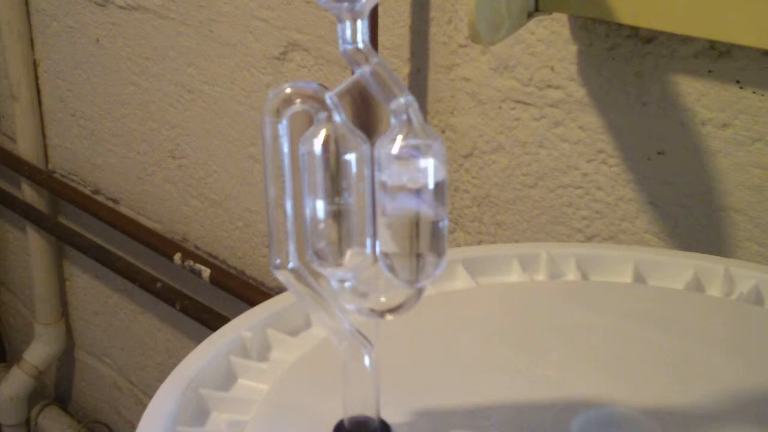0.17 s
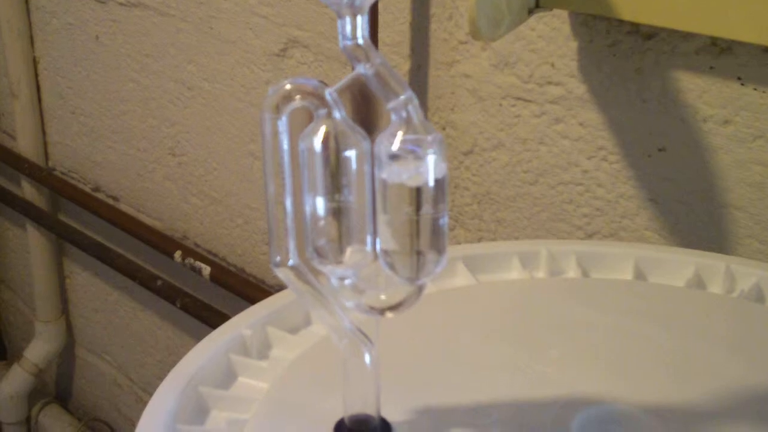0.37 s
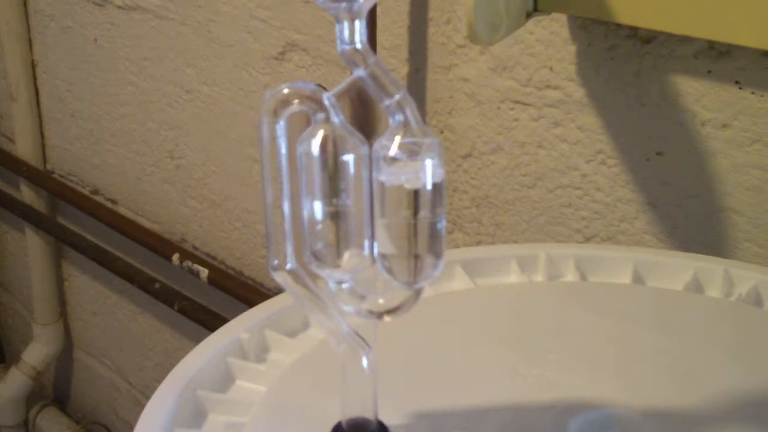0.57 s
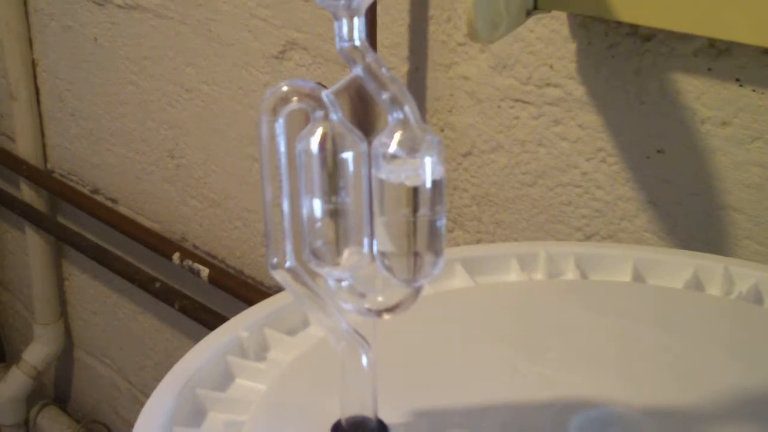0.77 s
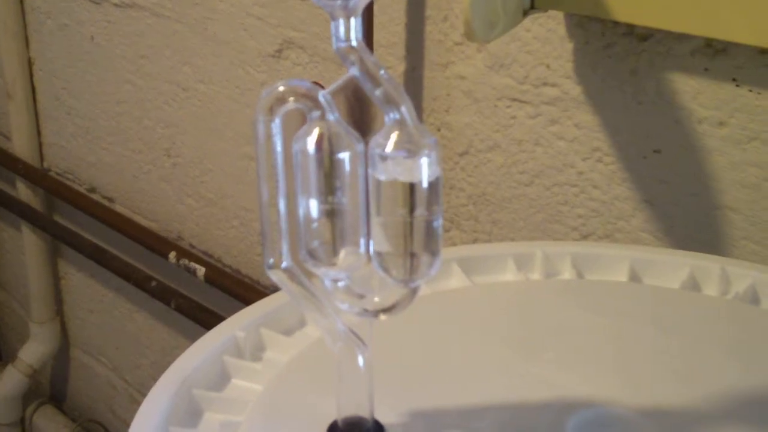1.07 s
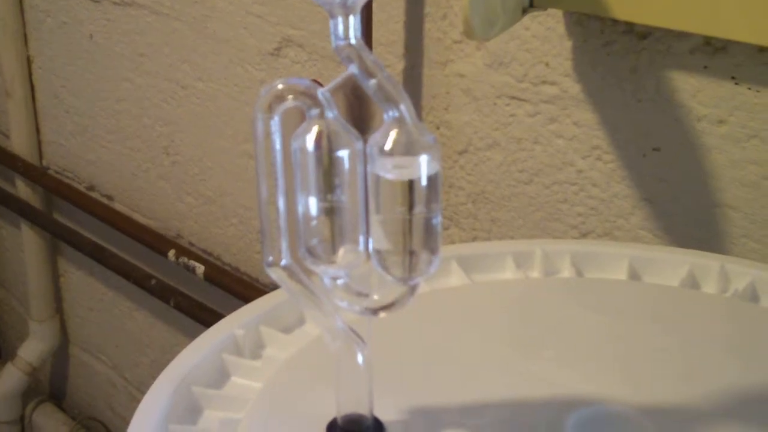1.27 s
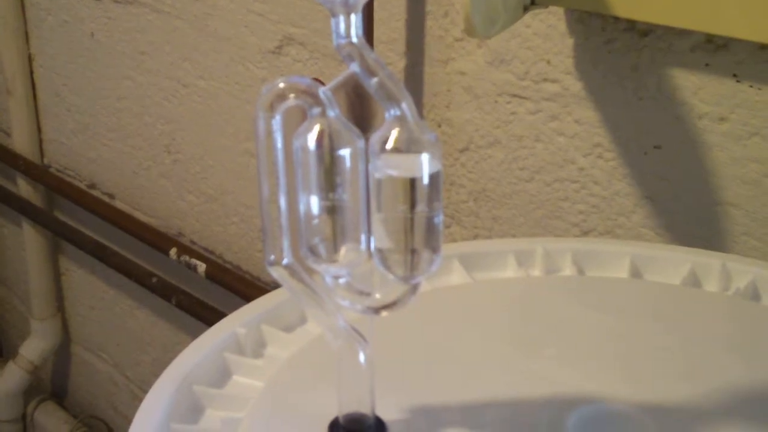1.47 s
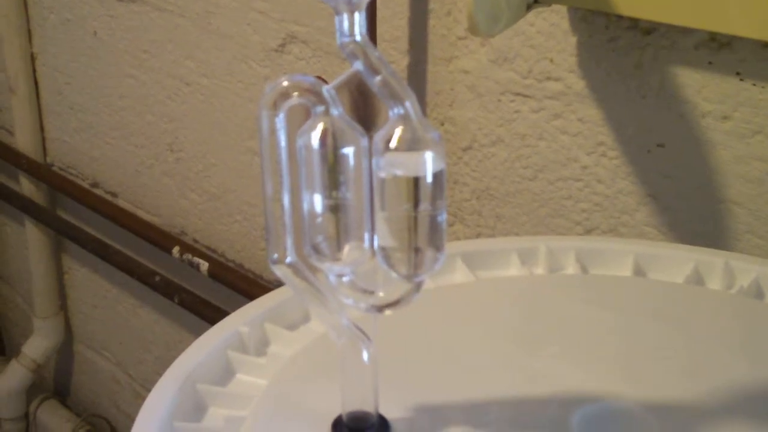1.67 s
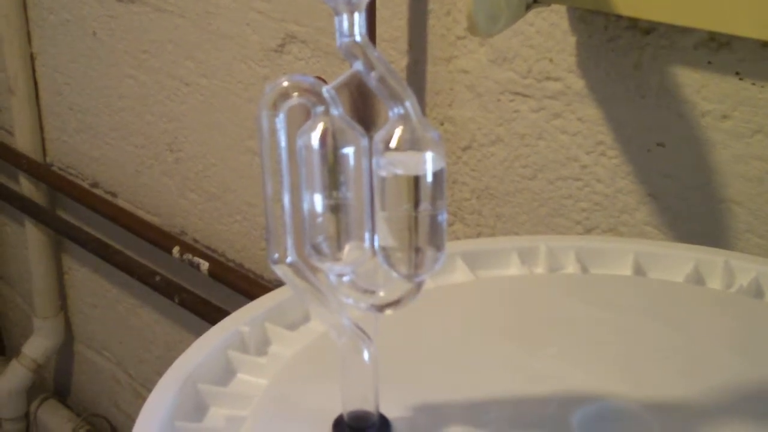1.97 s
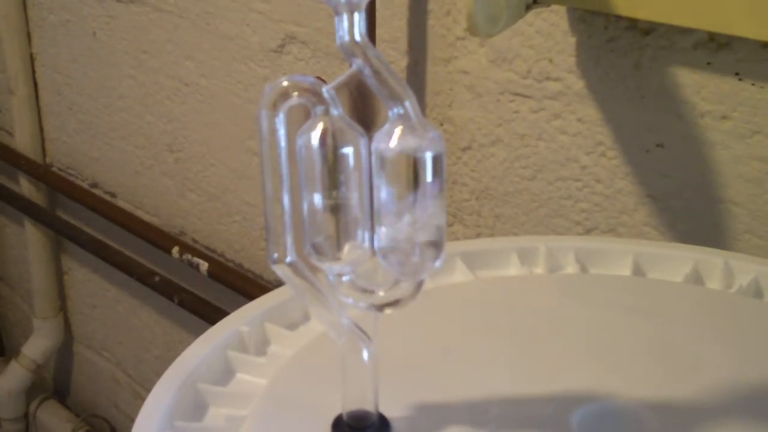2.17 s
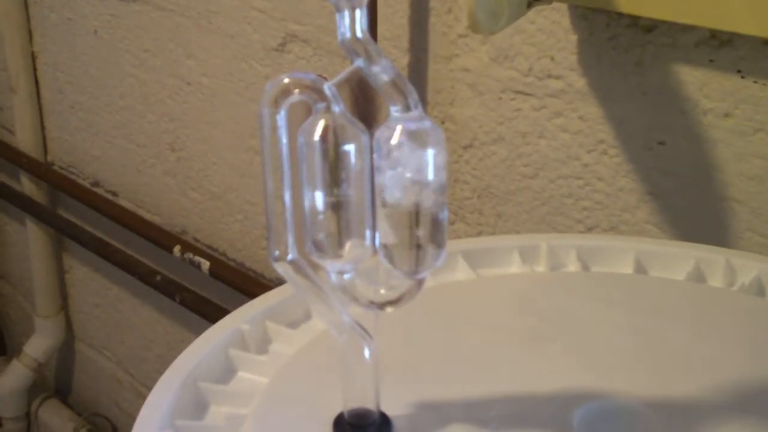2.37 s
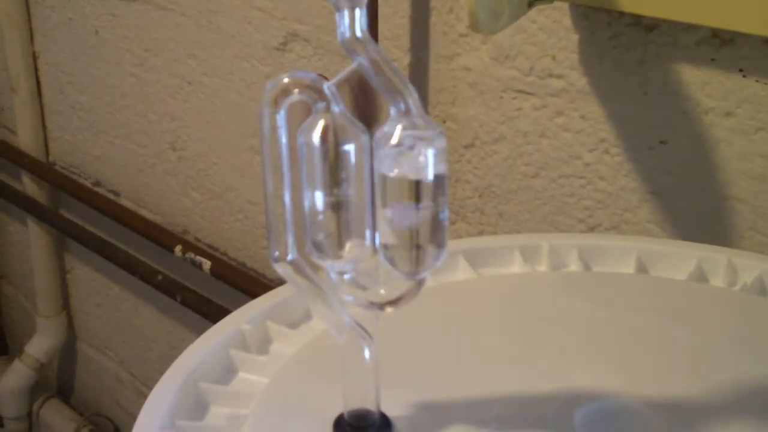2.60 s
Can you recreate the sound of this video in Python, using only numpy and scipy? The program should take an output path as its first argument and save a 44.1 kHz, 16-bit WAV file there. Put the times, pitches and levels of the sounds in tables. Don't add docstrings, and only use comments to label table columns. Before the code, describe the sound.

After a brief silence and a click, steady low machinery rumble and thin lens-motor buzzing fill a cellar; then a rapid string of watery blubs and soft lid thumps bursts from a bucket's airlock near the camera microphone.

```python
import sys
import numpy as np
from scipy import signal
from scipy.fft import rfft, irfft
from scipy.io import wavfile

SR = 44100
rng = np.random.default_rng(int(sys.argv[2]) if len(sys.argv) > 2 else 0)


def makeup_ratio(level_db):
    decades = np.asarray(level_db, float) / 20
    return 10 ** decades


def digitize_waveform(pressure):
    field = np.atleast_2d(pressure).T
    bounded = np.clip(field, -1, 1)
    quanta = np.round(bounded * 32767).astype(np.int16)
    wavfile.write(sys.argv[1], SR, quanta)


N = 120834
TIME_S = np.arange(N) / SR
FRAME_HZ = 29.97


def rms_one(x):
    return x / np.sqrt(np.mean(x ** 2) + 1e-20)


def resonate(x, hz, width_hz):
    r = np.exp(-np.pi * width_hz / SR)
    zeros = np.array([1, 0, -1]) * (1 - r * r) / 2
    poles = [1, -2 * r * np.cos(2 * np.pi * hz / SR), r * r]
    return signal.lfilter(zeros, poles, x)


def resonate_twice(x, hz, width_hz):
    return resonate(resonate(x, hz, width_hz), hz, width_hz)


def gate(t, start, length, edge):
    inside = np.minimum(t - start, start + length - t)
    return np.clip(inside / edge + .5, 0, 1)


def swell(age, rise):
    u = np.maximum(age, 0) / rise
    return u * np.exp(1 - u)


def blip(start, db, hz, rise, climb):
    age = np.maximum(TIME_S - start, 0)
    return makeup_ratio(db) * swell(age, rise) * np.sin(2 * np.pi * hz * age * (1 + climb * age))


# [t/s, peak level/dB, lid f/Hz]
SLUGS = [
    (2.188, -39, 160),
    (2.232, -28, 160),
    (2.263, -33, 165),
    (2.287, -29, 168),
    (2.305, -27, 168),
    (2.335, -30, 165),
    (2.369, -27, 150),
    (2.408, -24.5, 148),
    (2.438, -31, 155),
    (2.487, -32, 142),
]


def lid_thumps():
    push = sum(blip(start, db, hz, .0065, 0) for start, db, hz in SLUGS)
    return push + makeup_ratio(-4) * resonate(push, 164, 14)


def water_slosh():
    level_db, rise_s, lead_s = -22, .0077, .013
    envelope = sum(makeup_ratio(db + level_db) * swell(TIME_S - start + lead_s, rise_s) for start, db, _ in SLUGS)
    band = signal.butter(2, [343, 1270], "band", fs=SR, output="sos")
    return envelope * rms_one(signal.sosfilt(band, rng.standard_normal(N)))


# [t/s, peak level/dB, f/Hz]
BUBBLE_RINGS = [(2.183, -34.5, 396), (2.203, -34.5, 690), (2.212, -39, 584), (2.222, -36, 696),
                (2.232, -38, 600), (2.237, -40.5, 395), (2.254, -37, 552), (2.284, -38.5, 1170),
                (2.291, -42, 385), (2.293, -48, 1240), (2.305, -37.5, 567), (2.356, -53, 690),
                (2.366, -37, 723), (2.38, -39, 570), (2.413, -37, 542), (2.436, -40, 620)]


def bubble_rings():
    rise_cycles, climb_per_s = 2.7, 1
    return sum(blip(start, db, hz, rise_cycles / hz, climb_per_s) for start, db, hz in BUBBLE_RINGS)


def airlock():
    return lid_thumps() + water_slosh() + bubble_rings()


# [f/Hz, width/Hz, level/dB]
SHELL_MODES = [(6240, 540, -7), (7750, 490, -5.5), (8270, 320, 0), (9330, 540, -13), (11170, 780, -6),
               (12760, 170, 0), (13200, 340, -4.5), (13950, 320, -14), (14600, 900, -16)]


def shell_rattle():
    steps_per_s, jitter, spread_db = 133, .07, 1.5
    decay_s, steady_scrape = .001, .75
    draws = rng.standard_normal((500, 2))
    at = (np.arange(500) + jitter * draws[:, 0]) / steps_per_s
    keep = (at > 0) & (at < TIME_S[-1])
    kicks = np.zeros(N)
    kicks[(at[keep] * SR).astype(int)] = makeup_ratio(spread_db * draws[keep, 1])
    frame_ticks = np.arange(82) / FRAME_HZ + .007
    kicks[(frame_ticks * SR).astype(int)] += makeup_ratio(2)
    bursts = signal.lfilter([1], [1, -np.exp(-1 / (decay_s * SR))], kicks) + steady_scrape
    scrape = bursts * rng.standard_normal(N)
    shell = np.zeros(N)
    for k, (hz, width, db) in enumerate(SHELL_MODES):
        sign = (-1) ** k
        shell += sign * makeup_ratio(db) * resonate_twice(scrape, hz, 1.5 * width)
    return rms_one(shell)


# [start t/s, length t/s, level/dB]
MOTOR_RUNS = [
    (0.415, 0.65, -53),
    (1.257, 0.036, -53),
    (1.349, 0.174, -53),
    (1.558, 0.03, -54),
    (1.748, 0.042, -54),
    (1.858, 0.036, -53),
    (1.958, 0.032, -54),
    (2.255, 0.036, -53),
    (2.351, 0.09, -53),
    (2.556, 0.036, -52),
]
# [start t/s, length t/s, level/dB]
MOTOR_MORE_RUNS = [
    (.168, 0.021, -59),
    (.236, 0.022, -58),
    (.368, .024, -56),
    (1.143, 0.035, -54),
]


def lens_motor():
    trim_db, trim_s, edge_s, idle_db = 3.5, .0099, .0033, -55.5
    drive = np.zeros(N)
    for start, length, db in list(MOTOR_RUNS) + list(MOTOR_MORE_RUNS):
        drive += makeup_ratio(db + trim_db) * gate(TIME_S, start, length - trim_s, edge_s)
    return np.maximum(drive, makeup_ratio(idle_db)) * shell_rattle()


def tone(hz, db):
    return np.sqrt(2) * makeup_ratio(db) * np.sin(2 * np.pi * hz * TIME_S)


# [f/Hz, level/dB]
READOUT_TONES = [(7867.1, -66), (7492.5, -70)]
# [f/Hz, level/dB]
CLOCK_TONES = [(6000, -75), (7000, -82), (11000, -78), (12000, -79), (14000, -83), (8231, -75),
               (12742, -76)]


def electronics():
    phase = TIME_S % (1 / FRAME_HZ)
    pause_at, pause_s = .012, .0095
    pause = gate(phase, pause_at - pause_s / 2, pause_s, .002)
    whine = tone(14985, -67.5) * (1 - pause)
    frame = (TIME_S * FRAME_HZ).astype(int)
    third_frame_db, spread_db, bleed = 7, 3, .45
    frame_gain = makeup_ratio(third_frame_db * (frame % 3 == 0) + spread_db * rng.standard_normal(90)[frame])
    chirp_at, chirp_s = .0135, .013
    readout = gate(phase, chirp_at - chirp_s / 2, chirp_s, .0054)
    chirps = sum(tone(hz, db) for hz, db in READOUT_TONES) * (bleed + frame_gain * readout)
    return whine + chirps + sum(tone(hz, db) for hz, db in CLOCK_TONES)


def coloured(points):
    hz = np.arange(1, N // 2 + 2) * SR / N
    p = np.array(points)
    db = np.interp(np.log(hz), np.log(p[:, 0]), p[:, 1], left=-90, right=-90)
    return rms_one(irfft(rfft(rng.standard_normal(N)) * makeup_ratio(db), N))


# [f/Hz, level/dB]
RUMBLE_SPECTRUM = [(5, -16), (10, -5.5), (18, -1), (28, -11.5), (46, -22), (70, -8), (115, -17.5),
                   (190, -15), (225, -30)]
# [f/Hz, level/dB]
FAN_SPECTRUM = [(120, -28), (210, -6.5), (363, -1), (388, -7.5), (438, -1.5), (560, -5), (633, -2),
                (1170, -6), (2000, -16), (2600, -38), (4400, -120)]
# [f/Hz, level/dB]
HISS_SPECTRUM = [(1200, -26), (1900, 1.5), (4050, -2.5), (4900, -6), (5550, -13.5), (7000, -9),
                 (10000, -18), (14400, -30), (15400, -3)]
# [f/Hz, width/Hz, rms level/dB]
MACHINE_HUMS = [(17.5, 5, -41), (67, 10, -49), (103, 8, -53), (158, 14, -51), (260, 20, -58),
                (520, 20, -59.5), (641, 40, -56), (767, 10, -61), (903, 18, -61), (1138, 3, -56.5),
                (1501, 18, -66)]


def cellar():
    white = rng.standard_normal(N)
    hums = sum(makeup_ratio(db) * rms_one(resonate_twice(white, hz, width)) for hz, width, db in MACHINE_HUMS)
    rumble = makeup_ratio(-36.5) * coloured(RUMBLE_SPECTRUM)
    fan = makeup_ratio(-44) * coloured(FAN_SPECTRUM)
    hiss = makeup_ratio(-53.5) * coloured(HISS_SPECTRUM)
    return rumble + fan + hiss + hums


def scene():
    return np.tile(airlock() + lens_motor() + electronics() + cellar(), (2, 1))


def roll_off(x):
    return signal.sosfilt(signal.butter(12, 16220, fs=SR, output="sos"), x)


def record(dry):
    open_s, step_s, offset = .1058, .1072, .0575
    sag, kick, kick_s = .02, .04, .001
    low = signal.butter(2, 37, fs=SR, output="sos")
    wander = makeup_ratio(-61.5) * rms_one(signal.sosfilt(low, rng.standard_normal(N)))
    band_limit = signal.ellip(14, .5, 95, 15150, fs=SR, output="sos")
    heard = signal.sosfilt(band_limit, dry)
    sagging = -sag * (TIME_S - open_s) / (step_s - open_s)
    recovery = kick * np.exp(-np.abs(TIME_S - step_s) / kick_s)
    click = np.where(TIME_S < step_s, sagging, recovery)
    opposite = np.array([[1], [-1]])
    x = (heard + click + (wander - offset) * opposite) * (TIME_S > open_s)
    smooth = signal.cheby2(16, 50, 16000, fs=SR, output="sos")
    x = signal.sosfiltfilt(smooth, x) * (TIME_S > open_s - .003)
    return roll_off(x)


dry = scene()
out = record(dry)
digitize_waveform(out)
```